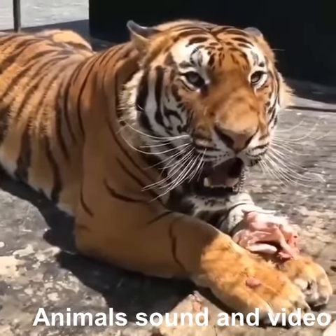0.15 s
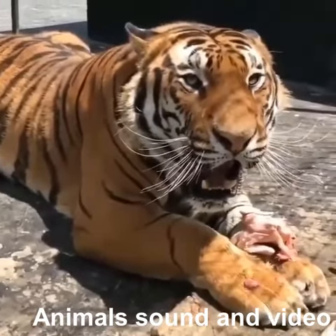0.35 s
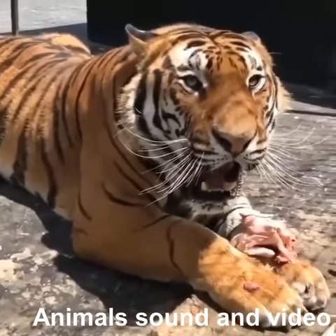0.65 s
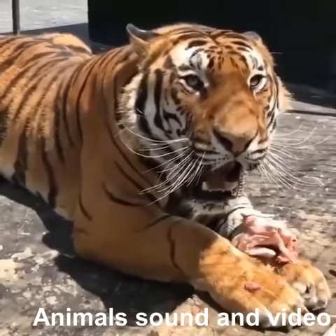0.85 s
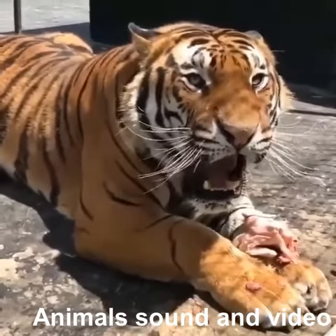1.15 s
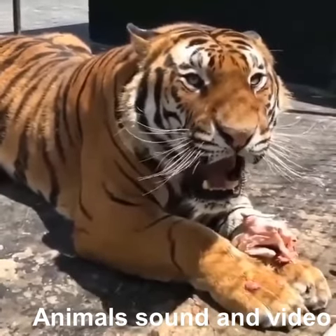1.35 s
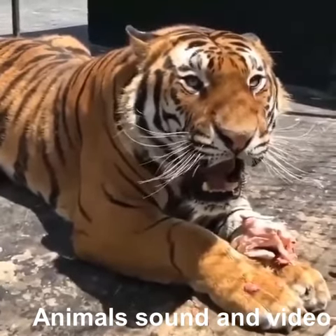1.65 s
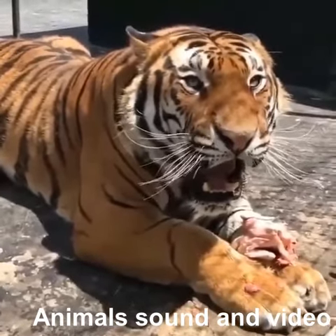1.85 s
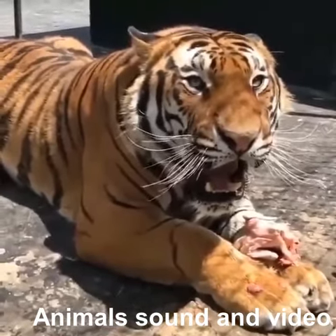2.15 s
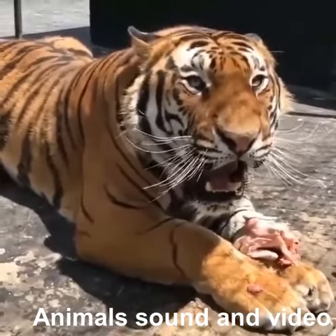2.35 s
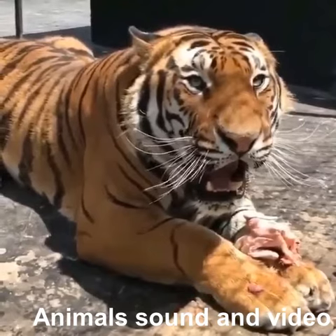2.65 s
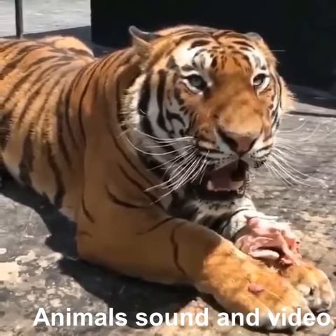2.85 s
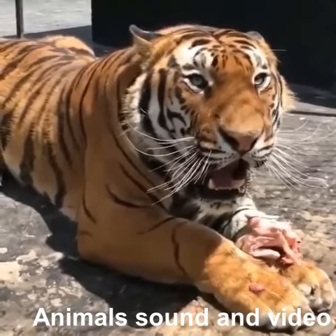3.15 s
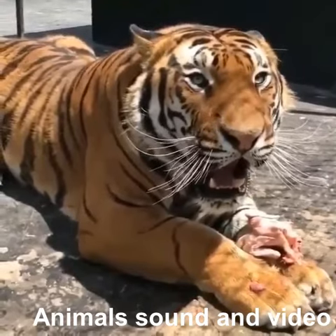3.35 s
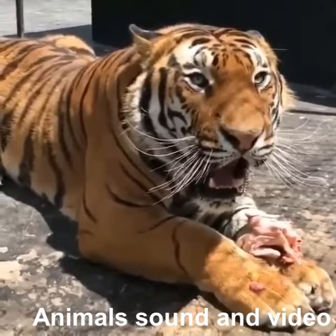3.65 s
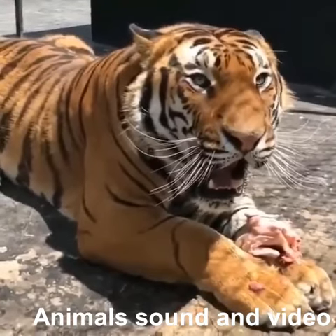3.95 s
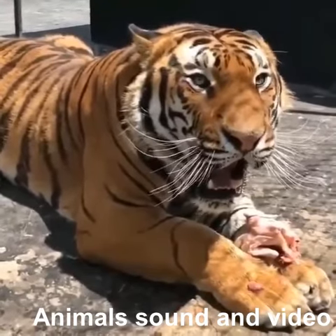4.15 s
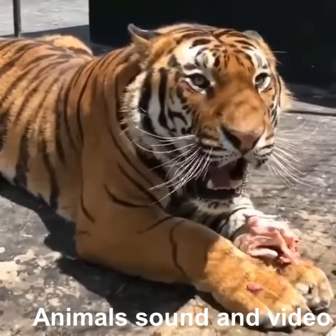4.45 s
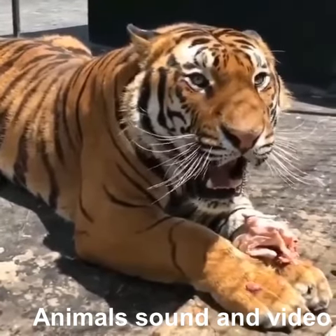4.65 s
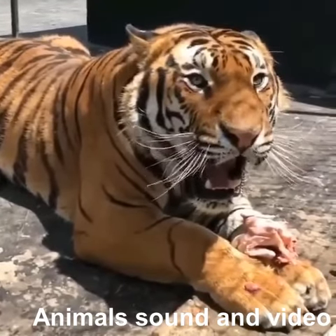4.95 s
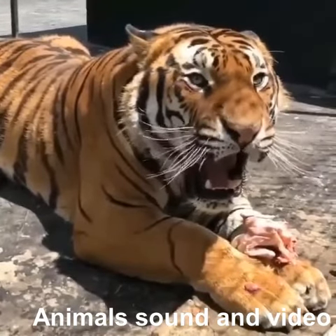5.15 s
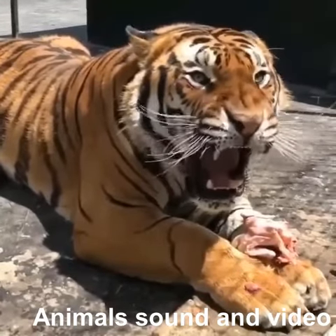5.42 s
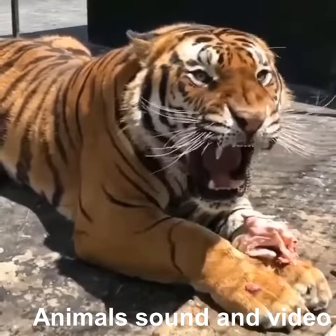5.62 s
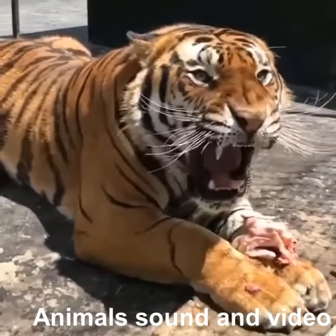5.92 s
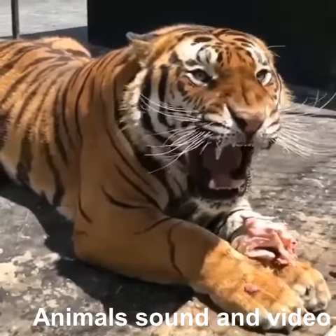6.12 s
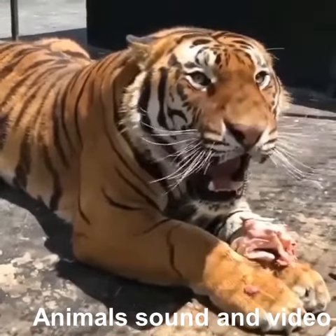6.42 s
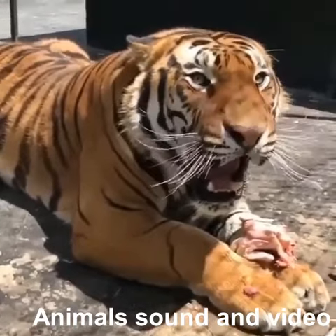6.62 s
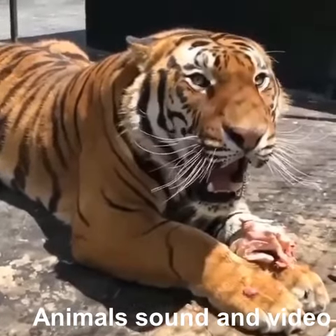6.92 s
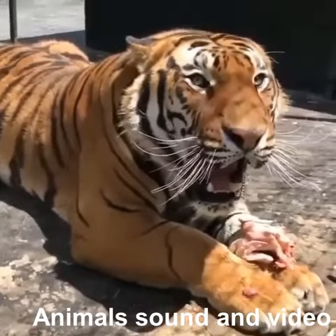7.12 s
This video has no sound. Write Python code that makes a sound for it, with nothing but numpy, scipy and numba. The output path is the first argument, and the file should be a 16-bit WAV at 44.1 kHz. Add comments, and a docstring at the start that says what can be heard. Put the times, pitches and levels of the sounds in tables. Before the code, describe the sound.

A tiger lying close by growls in deep, fluttering, raspy rumbles on every breath in and out, swelling to a rough open-mouthed snarl.

```python
"""A big cat growls close by on every breath, out and in, with the level dipping at each turn of the air.
Its heavy vocal folds flap some 24-56 times a second. Each flap slaps shut to excite the chest resonances,
and lets out a puff of turbulent air that rasps in the throat and hisses in the mouth.
Short whistles sound as the air turns; dull echoes and steady noise with a smooth spectrum form the yard."""
import sys
import numpy as np
from scipy import signal
from scipy.fft import rfft, irfft
from scipy.io import wavfile
from scipy.ndimage import uniform_filter1d
from numba import njit

SR = 44100
rng = np.random.default_rng(int(sys.argv[2]) if len(sys.argv) > 2 else 0)


def gain_from_decibels(decibels):
    """Convert decibel values to linear amplitude factors."""
    exponent = np.asarray(decibels, float) / 20
    return 10 ** exponent


def unload_wav(signal):
    """Save mono or channel-first audio to the path in sys.argv[1] as 16-bit WAV at rate SR, clipped to [-1, 1]."""
    wavfile.write(
        sys.argv[1],
        SR,
        np.round(np.clip(np.atleast_2d(signal).T, -1, 1) * 32767).astype(np.int16),
    )


N = 321048

# breaths, out and in by turns: start t/s, end t/s, deep thump over effort/dB, chest ring over effort/dB,
# usual steady leak [0-1]
BREATHS = [(-.5, 0.296, -6.5, -4.5, 0.41), (0.242, 1.261, -2, -4, 0.49), (1.334, 3.812, -2, -4.5, 0.26),
           (3.823, 4.762, -5.5, -5.5, 0.58), (4.83, 6.613, 1, -6, 0.37), (6.663, 7.6, -0.5, -0.5, 0.37)]


def yard():
    """Stationary noise: white noise takes on a fixed spectral envelope."""
    # background spectrum: f/Hz, relative spectral level/dB
    spectrum = [(18, -43), (30, 10.5), (149, -2), (319, -10.5), (858, -44), (1080, -29.5), (4040, -27.5),
                (13000, -45.5)]
    hz, level_db = np.transpose(spectrum)
    bins_hz = np.arange(1, N // 2 + 2) * SR / N
    colour = gain_from_decibels(np.interp(np.log(bins_hz), np.log(hz), level_db))
    noise = irfft(rfft(rng.standard_normal(N)) * colour, N)
    return gain_from_decibels(-44) * rms_one(noise)


def rms_one(x):
    """Normalization of mean power: scale to rms 1."""
    return x / np.sqrt(np.mean(x ** 2) + 1e-20)


def evened(x, window_s):
    """Envelope normalization: divide out the slow level, so that only the beat of the flaps is left."""
    size = int(window_s * SR)
    power = uniform_filter1d(uniform_filter1d(x ** 2, size), size)
    return x / np.sqrt(power + 1e-9)


def fading(x, fade_s):
    """Exponential relaxation: every click leaves a decaying tail of the click's own height."""
    return signal.lfilter([1], [1, -np.exp(-1 / (fade_s * SR))], x + 1e-18)


def filtered(x, order, hz, kind="low"):
    """Butterworth filtering: a maximally flat passband on one side of the corner frequency."""
    return signal.sosfilt(signal.butter(order, hz, kind, fs=SR, output="sos"), x)


def curve(rows):
    """Linear interpolation: each column of a table after its time column, one value a sample."""
    s, *columns = np.transpose(rows)
    return [np.interp(np.arange(N) / SR, s, c) for c in columns]


def flicker(per_s):
    """Band-limited fluctuation: straight lines join random steps of spread 1."""
    steps = rng.standard_normal(int(per_s * N / SR) + 2)
    return np.interp(np.arange(N) * per_s / SR, np.arange(len(steps)), steps)


@njit
def resonate(x, turn, r):
    """Two-pole resonance with a moving centre; turn = cosine of the angle per sample, r = pole radius."""
    out = np.zeros(len(x))
    for i in range(2, len(x)):
        out[i] = (1 - r * r) / 2 * (x[i] - x[i - 2]) + 2 * r * turn[i] * out[i - 1] - r * r * out[i - 2]
    return out


def cavity(x, resonances, shift, strays, jaws=0):
    """Modal superposition: parallel resonances of alternating sign stray alone, as soft wet walls make them."""
    pitch_stray, level_stray_db = strays
    out = 0
    for k, (hz, width_hz, level_db, *open_db) in enumerate(resonances):
        centre_hz = hz * shift * (1 + pitch_stray * flicker(20))
        turn = np.cos(2 * np.pi * centre_hz / SR)
        steadiness = min(300 / width_hz, 1)  # resonances wider than 300 Hz keep their strength better
        drive_db = level_stray_db * steadiness * flicker(55) + sum(open_db) * jaws
        drive = x * gain_from_decibels(drive_db) + 1e-18
        out = out + (-1) ** k * gain_from_decibels(level_db) * resonate(drive, turn, np.exp(-np.pi * width_hz / SR))
    return out


def tract(x, inward, going_out, coming_in, shift=1, strays=(0, 0), jaws=0):
    """Source-filter principle: the airway rings differently with the air going out and coming in."""
    outgoing = cavity(x * ~inward, going_out, shift, strays, jaws)
    return outgoing + cavity(x * inward, coming_in, shift, strays)


def swell(breath, late_s, attack_s):
    """Onset and decay envelope in dB under the effort, rising as a breath starts and sinking at its end."""
    release_s, silence_db = (0.061, 0.031), -22  # pairs are (going out, coming in)
    t, way = np.arange(N) / SR, breath % 2
    start, end = np.transpose(BREATHS)[:2, breath]
    rise = (t - start - np.array(late_s)[way]) / np.array(attack_s)[way]
    fall = (end - t) / np.array(release_s)[way]
    return silence_db * (1 - np.clip(np.minimum(rise, fall), -.5, 1))


def squeaks():
    """Frequency-modulated tones: wavering whistles that swell, sag in pitch and fade."""
    # throat whistles as the air turns: start t/s, length t/s, mid-whistle f/Hz, mean peak level/dB
    whistles = [(3.833, 0.049, 838, -39), (6.654, 0.02, 850, -42), (6.692, 0.012, 820, -28),
                (6.73, 0.034, 810, -18)]
    sag_hz_per_s = 900
    t, out = np.arange(N) / SR, np.zeros(N)
    for s, length_s, hz, level_db in whistles:
        since = np.clip(t - s, 0, length_s)
        pitch_hz = hz - sag_hz_per_s * (since - length_s / 2) + 15 * flicker(150)
        envelope = gain_from_decibels(level_db + 1.0 * flicker(240)) * np.sin(np.pi * since / length_s)
        out += envelope * np.sin(2 * np.pi * np.cumsum(pitch_hz) / SR)
    return out


def flaps(breath, uneven, per_s):
    """Relaxation oscillation of the folds: one click a cycle, uneven in time and size."""
    # flaps that stand out, one list a breath: t/s, puff level over an even flap/dB
    clear_flaps = [
        [(.035, -1)],
        [(.796, 3), (.928, -4), (.96, -3), (1.091, 1.5), (1.145, 2)],
        [(1.35, 1), (1.395, 0), (1.984, 3), (3.439, 3.5)],
        [(3.948, 11), (3.997, 12), (4.459, 6.5), (4.52, 6), (4.561, 1.5), (4.602, 3.5), (4.642, 4),
         (4.683, 6.5), (4.723, 5.5)],
        [(4.87, 6), (4.892, 6), (5.877, 3)],
        [(6.975, 6)],
    ]
    rate_wander = .06 * uneven * flicker(9)
    cycles = np.cumsum(per_s * (1 + rate_wander)) / SR
    clear_db, free = np.zeros(N), np.ones(N)
    for k, rows in enumerate(clear_flaps):
        s, level_db = np.transpose(rows)
        marks = (s * SR).astype(int)
        # bend the count so that a whole number of cycles lies between clear flaps
        between = np.maximum(np.round(np.diff(cycles[marks])), 1)
        whole = np.r_[0, np.cumsum(between)]
        bend = np.interp(np.arange(N), marks, whole - cycles[marks] + 1e-6)
        cycles = np.where(breath == k, cycles + bend, cycles)
        for nearby in (-1, 0, 1):
            clear_db[marks + nearby], free[marks + nearby] = level_db, 0
    at = np.r_[2, np.flatnonzero(np.diff(np.floor(cycles)) == 1)]
    chance = rng.standard_normal((len(at), 3)) * free[at, None]  # clear flaps do not stray
    delay = (.13 * uneven[at] * chance[:, 0] * SR / per_s[at]).astype(int)
    place = np.clip(at + delay, 0, N - 1)
    thumps, puffs = np.zeros((2, N))
    thumps[place] = gain_from_decibels(5.5 * uneven[at] * chance[:, 1])
    # the air jet follows the flap only loosely
    puffs[place] = thumps[place] ** 0.33 * gain_from_decibels(1.03 * chance[:, 2] + clear_db[at])
    return thumps, puffs


def fold_slap(thumps, uneven, noise):
    """Impulsive excitation: the folds slap shut just after the puff begins, a soft low-passed blow."""
    closing = np.pad(thumps, (int(0.00494 * SR), 0))[:N]
    slack = -rms_one(closing) + 1.8 * uneven ** 1.5 * noise  # slack folds blur the low lines
    return filtered(slack, 1, 715)


def deep_thump(slap, inward, jaws, deep_hz):
    """Forced resonance: two low modes answer each slap, the upper one moving as the lungs change size."""
    # deep resonances, out and in: f/Hz, width f/Hz, relative level/dB
    deep_out = [(47.6, 12.3, 2.9), (93, 27.4, 0.82)]
    deep_in = [(47.7, 22, 3.5), (87, 47, 12.5)]
    lowest = tract(slap, inward, deep_out[:1], deep_in[:1])
    upper = tract(slap, inward, deep_out[1:], deep_in[1:], deep_hz / deep_out[1][0])
    return evened(gain_from_decibels(-4 * jaws) * lowest - upper, 0.11)  # open jaws weaken the lowest


def chest_ring(slap, noise, breath, inward, uneven, low_chest_hz, air_db):
    """Damped modal ringing: slaps excite the chest, and the air stream also stirs its upper modes."""
    # chest resonances, out and in: f/Hz, width f/Hz, relative level/dB
    chest_out = [(170, 24, 1), (248, 24, -3), (345, 50, -17), (430, 35, -18)]
    chest_in = [(170, 32, 4), (249, 63, -9), (432, 40, -11.5)]
    # upper resonances over the lowest, per breath/dB; a strong air stream lifts them
    upper_db = np.array([-2, -1, -3.5, -1, 1.5, -3.5])[breath] + 0.12 * (air_db + 35)
    lowest = tract(slap, inward, chest_out[:1], chest_in[:1], low_chest_hz / chest_out[0][0])
    strays = uneven * .1, uneven * 6  # share of pitch, dB; calm folds leave the chest still
    upper = tract(slap + .3 * noise, inward, chest_out[1:], chest_in[1:], strays=strays)
    return evened(lowest - gain_from_decibels(upper_db) * upper, 0.42)


def throat_rasp(puffs, steady_leak, noise, inward, uneven, jaws):
    """Amplitude-modulated turbulence: puffs and a steady leak gate noise into the throat resonances."""
    # throat resonances going out: f/Hz, width f/Hz, relative level/dB, gain at full jaw opening/dB
    throat_out = [(538.3, 25, -6.5, 2.5), (768, 52.4, -2.5, -0.5), (846, 49, -13.5, 9), (931, 66, -12, 7),
                  (1221, 74, -10.5, -0.5), (1490, 78, -15.5, 2.5), (1706, 48, -11, -2),
                  (1945, 187, -16.5, -1)]
    # throat resonances coming in: f/Hz, width f/Hz, relative level/dB
    throat_in = [(526, 32, -5.5), (743, 55.5, 1.5), (957, 144, -6), (1230, 43, 0.5), (1517, 63, -8.5),
                 (1912, 130, -8.5)]
    puff = fading(puffs, 0.0043) - fading(puffs, 0.0017)  # the gap opens, then narrows
    wet = gain_from_decibels(1.57 * flicker(90))  # spittle breaks up the air stream
    rasp = (puff + 0.52 * steady_leak) * wet * noise + 4.0 * puffs
    looseness = .5 + 1.3 * uneven  # even flaps leave half the basic straying
    strays = looseness * 0.031, looseness * 1.93  # share of pitch, dB
    jaw_shift = 1 + 0.021 * jaws  # open jaws raise the pitch
    return evened(tract(rasp, inward, throat_out, throat_in, jaw_shift, strays, jaws), 0.27)


def mouth_hiss(puffs, leak, click_noise, noises, inward):
    """Jet turbulence in a resonator: brief jets and cracks excite the mouth; returns middle and side hiss."""
    # mouth resonances, out and in: f/Hz, width f/Hz, relative level/dB
    mouth_out = [(2516, 230, -7.5), (3084, 83, 1), (3350, 260, -4), (4202, 113, -1.5), (4637, 77, -0.5),
                 (5370, 124, -4.5), (5930, 227, -0.5), (6220, 4300, -9), (12420, 1140, -13)]
    mouth_in = [(2535, 45, 4.5), (3160, 480, -2.5), (4360, 1300, -8.5), (5510, 220, -2), (6140, 230, 0),
                (7120, 580, -2.5), (8800, 880, -7), (11600, 1400, -10.5)]
    # treble over the rest of the hiss: t/s, mean gain/dB
    treble = [(0, 5), (.5, 0), (.75, -3), (1.3, -2.5), (1.38, 4), (1.46, -0.5), (1.9, -5), (2.8, 3),
              (3.6, 1.5), (3.95, -2.5), (4.7, -3.5), (4.89, -14), (4.97, -10.5), (5.35, 0.5), (6.1, -4.5),
              (6.75, 1.5), (6.9, 0), (7.28, 2.5)]
    # the jet into the mouth is briefer than the puff in the throat
    puff = uniform_filter1d(fading(puffs, .0035) - fading(puffs, 0.0016), int(0.003 * SR))
    jet = (puff + 1.09 * leak) * gain_from_decibels(2.0 * flicker(60))
    crack = 4 * filtered(puffs * np.sign(click_noise), 2, 5030)  # each flap cracks, with random sign
    hiss, wide = [evened(tract(jet * noise + crack, inward, mouth_out, mouth_in, strays=(0.012, 3.5)), 0.17)
                  for noise in noises]
    airy = filtered(hiss, 1, 4400, "high")  # the treble flutters on its own
    hiss = hiss - airy + airy * gain_from_decibels(curve(treble)[0] + 3.5 * flicker(10))
    wide = filtered(wide, 4, 4300, "high")
    wide *= flicker(12) > 0  # the treble flickers between narrow and wide
    return hiss, wide


def growl():
    """Coupled source-filter system: the same flaps drive thump, chest ring, throat rasp and mouth hiss."""
    # effort, one list a breath: t/s, effort as voice level/dB, mouth hiss over effort/dB
    efforts = [
        [(0.0, -31.5, -20), (0.17, -30.5, -23), (0.24, -35.5, -20)],
        [(0.36, -26.5, -15.5), (0.396, -26, -14), (0.458, -28.5, -12.5), (1.026, -23, -16.5),
         (1.124, -26.5, -17), (1.24, -29, -6.5)],
        [(1.36, -20.5, -19), (1.4, -20, -11.5), (1.45, -20, -6.5), (1.9, -23, -6.5), (2.4, -26, -9),
         (2.75, -30.5, -14.5), (3.2, -32.5, -20), (3.5, -35.5, -23), (3.74, -35.5, -25)],
        [(3.94, -28, -13.5), (4.296, -25.5, -15), (4.374, -29, -14.5), (4.568, -24.5, -15.5),
         (4.7, -27.5, -19.5), (4.735, -24.5, -16)],
        [(4.86, -25, -17.5), (4.888, -20.5, -9), (4.97, -23, -6.5), (5.294, -22.5, -9.5), (5.7, -20, -6.5),
         (5.78, -17, -8.5), (5.944, -18, -5.5), (5.968, -19, -5), (6.16, -18.5, -8.5), (6.216, -22.5, -5),
         (6.54, -32.5, -19)],
        [(6.78, -27, -10), (6.822, -18.5, -20), (6.95, -33, -8), (6.974, -28, -18.5), (7.056, -25.5, -14.5),
         (7.26, -27.5, -15)],
    ]
    # flap rate, one list a breath, mostly slowing as the air runs out: t/s, mean f/Hz
    flap_rate = [
        [(0, 28.3), (.27, 26)],
        [(.33, 46.2), (.565, 36.2), (.682, 36.2), (.86, 30.2), (1.02, 30.6), (1.27, 44)],
        [(1.35, 51), (1.836, 48), (2.322, 44.5), (2.42, 43.5), (2.5, 40), (2.8, 36.5), (2.929, 33.5),
         (3.06, 28.8), (3.78, 23.9)],
        [(3.89, 52.3), (4.014, 40.8), (4.511, 24.8), (4.76, 24.7)],
        [(4.85, 46.1), (4.98, 48.4), (5.55, 47.7), (5.667, 51.5), (6.25, 48.4), (6.367, 40.4), (6.6, 29)],
        [(6.76, 56), (6.968, 53.2), (7.28, 52.9)],
    ]
    # how far the flaps stray in time, size and rate: t/s, unevenness [0-1]
    unevenness = [(0, .05), (.3, .05), (.34, .4), (.45, .22), (1.25, .24), (1.35, .55), (1.78, .55),
                  (1.88, .16), (2.4, .07), (3.8, .05), (3.9, .3), (4.05, .22), (4.32, .22), (4.4, .4),
                  (4.5, .05), (4.8, .05), (4.86, .12), (5.12, .2), (5.3, .6), (6.2, .7), (6.3, .12),
                  (6.6, .1), (6.76, .65), (6.9, .4), (7, .25), (7.28, .22)]
    # lowest chest resonance, which moves with the larynx: t/s, f/Hz
    low_chest = [(0, 164), (.6, 174), (1.25, 173.9), (1.35, 148), (1.75, 143.8), (1.9, 166), (2.5, 168.7),
                 (3.8, 168), (3.9, 176), (4.85, 162), (5.3, 160.1), (6.3, 138), (6.75, 140), (6.85, 131.1),
                 (7, 153), (7.28, 165)]
    # jaws opening for the snarl: t/s, opening [0-1]
    jaw_opening = [(0, 0.23), (5.2, 0.45), (5.7, 0.9), (6.2, 1), (6.45, 0.1), (7.28, 0.7)]
    # deep resonances: t/s, f/Hz of the upper one going out (shifted in proportion coming in), level of both/dB
    deep_motion = [(0, 77, -0.5), (.3, 74, -7), (.4, 84.2, 0.5), (.65, 69.5, 0.5), (.85, 90, -1.5),
                   (1.25, 87, 1), (1.4, 91, 1), (2.3, 89, 1.5), (2.9, 69.6, 0), (3.1, 72.66, -2.5),
                   (3.8, 66.4, -5), (3.92, 98, 5), (4.1, 77.1, -0.5), (4.33, 64, 0), (4.45, 80.4, -5),
                   (4.57, 69.7, -1), (4.75, 77.5, -8.5), (4.86, 91, -2.5), (5.6, 98, -0.5), (6.1, 103, 1),
                   (6.45, 76, -4), (6.8, 99.2, 2), (7.28, 103, 0)]
    # folds closing less or more tightly: t/s, leak over the breath's usual leak/dB
    leak_change = [(0, -0.5), (.7, 1), (1.2, -3), (1.5, -2), (2.4, -2), (2.7, 5), (3.05, 4.5), (3.3, -0.5),
                   (3.9, -1), (4.4, 0), (4.55, -2.5), (4.75, -3), (4.9, -3), (5.6, -0.5), (6.3, 0),
                   (7.28, -0.5)]
    full_leak_per_s = 39.5  # flaps slower than this close the folds for longer and leak less

    start, end, deep_over_db, chest_over_db, usual_leak = np.transpose(BREATHS)
    breath = np.searchsorted((end[:-1] + start[1:]) / 2, np.arange(N) / SR)
    way = breath % 2
    inward = way == 1
    effort_db, hiss_over_db = curve(np.concatenate(efforts))
    per_s, = curve(np.concatenate(flap_rate))
    (uneven,), (low_chest_hz,), (jaws,) = curve(unevenness), curve(low_chest), curve(jaw_opening)
    deep_hz, deep_lift_db = curve(deep_motion)
    leak = np.clip(usual_leak[breath], 0, 1) * gain_from_decibels(curve(leak_change)[0])
    slowness = np.minimum(per_s / full_leak_per_s, 1)

    # level = effort + offset + share of the effort's distance from -26 dB; pairs are (going out, coming in)
    push_db = effort_db + 26
    voice_db = effort_db + swell(breath, (0, 0), (0.017, 0.091))
    # drawn-in air rasps and hisses before the folds catch
    folds_db = effort_db + swell(breath, (0, 0.068), (0.024, 0.036))
    deep_db = folds_db + deep_over_db[breath] + np.array((0.21, 0.027))[way] * push_db
    deep_db = deep_db + 0.42 * (full_leak_per_s - per_s) + deep_lift_db  # slower flaps swing wider
    chest_db = folds_db + chest_over_db[breath] + np.array((0.022, 0.026))[way] * push_db
    throat_db = voice_db + np.array((-5.5, -4.5))[way] + np.array((0.23, 0.072))[way] * push_db
    throat_db = throat_db - 1.5 * jaws
    hiss_db = voice_db + hiss_over_db

    thumps, puffs = flaps(breath, uneven, per_s)
    air = rng.standard_normal((4, N))
    slap = fold_slap(thumps, uneven, air[0])
    deep = deep_thump(slap, inward, jaws, deep_hz)
    chest = chest_ring(slap, air[0], breath, inward, uneven, low_chest_hz, effort_db + hiss_over_db)
    throat = throat_rasp(puffs, leak * slowness, air[1], inward, uneven, jaws)
    hiss, wide = mouth_hiss(puffs, leak * slowness ** 1.4, air[1], air[2:], inward)

    low = gain_from_decibels(deep_db) * deep + gain_from_decibels(chest_db) * chest
    # between deep thump and chest ring the sound partly cancels, in a valley 26 Hz wide
    valley = np.cos(2 * np.pi * np.sqrt(deep_hz * low_chest_hz) / SR)
    low = low - .65 * resonate(low, valley, np.exp(-np.pi * 26 / SR))
    middle = low + gain_from_decibels(throat_db) * throat + gain_from_decibels(hiss_db) * hiss
    return middle + squeaks(), gain_from_decibels(hiss_db - 9) * wide


def scene():
    """Superposition of direct and reflected sound: the cat straight ahead, dull echoes and the yard noise."""
    # reflections from ground and walls: delay t/s, level/dB
    echoes = [(0.012, -13), (0.023, -13.5), (.041, -18.5)]
    middle, side = growl()
    dull = filtered(middle, 1, 3000)
    for delay_s, level_db in echoes:
        lag = int(delay_s * SR)
        middle = middle + gain_from_decibels(level_db) * np.pad(dull, (lag, 0))[:N]
    return middle + yard() + side * [[1], [-1]]


def low_pass(x):
    """Removes everything above the highest recorded frequency."""
    return signal.sosfilt(signal.butter(12, 13910, fs=SR, output="sos"), x)


def record(dry):
    """High-pass response: the microphone drops the deepest bass, below about 30 Hz."""
    mix = filtered(dry, 2, 30, "high")
    return low_pass(mix)


dry = scene()
out = record(dry)
unload_wav(out)
```